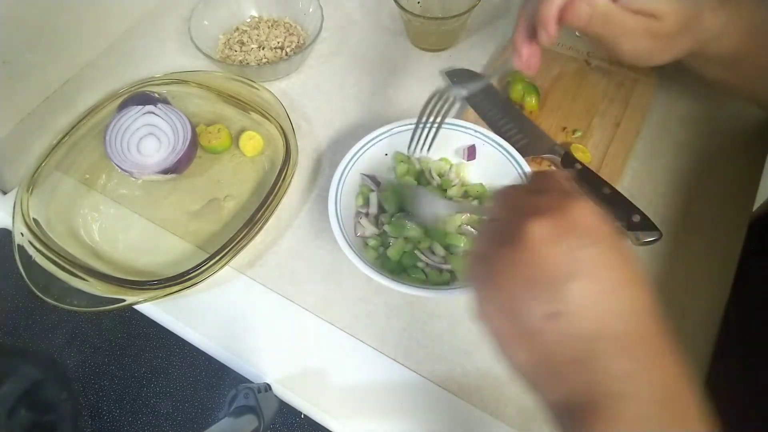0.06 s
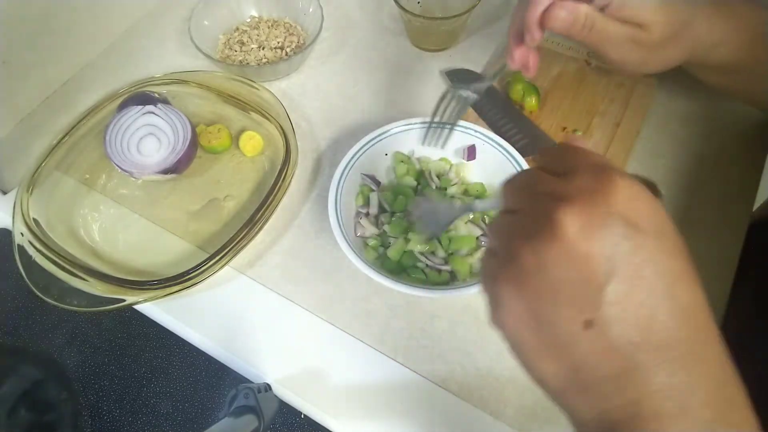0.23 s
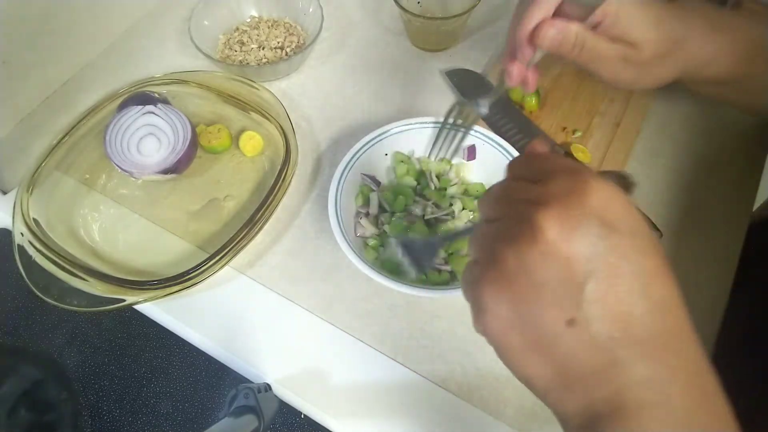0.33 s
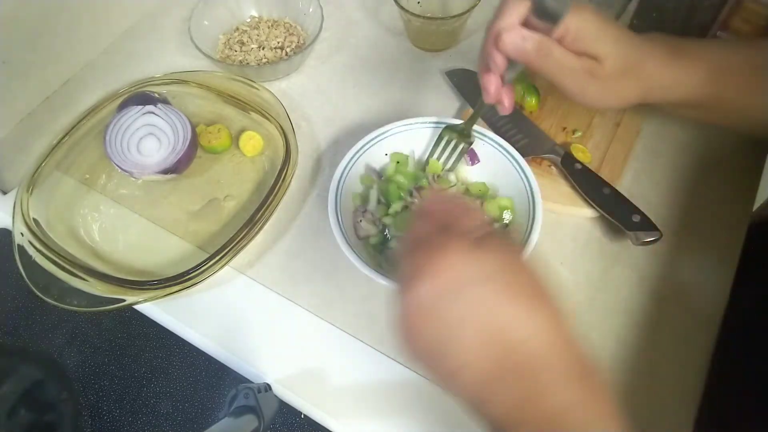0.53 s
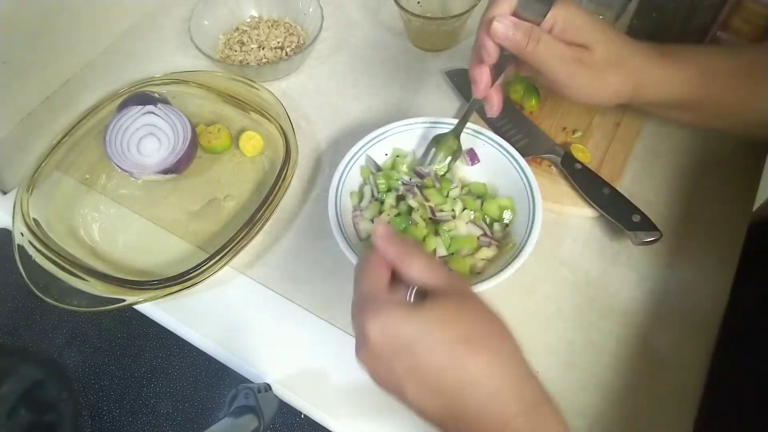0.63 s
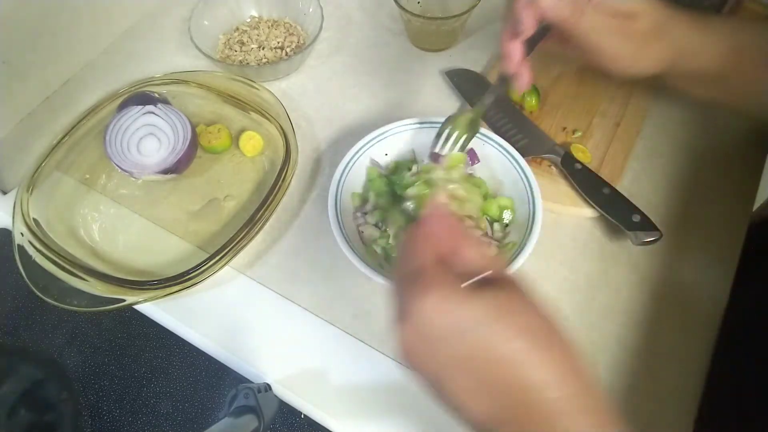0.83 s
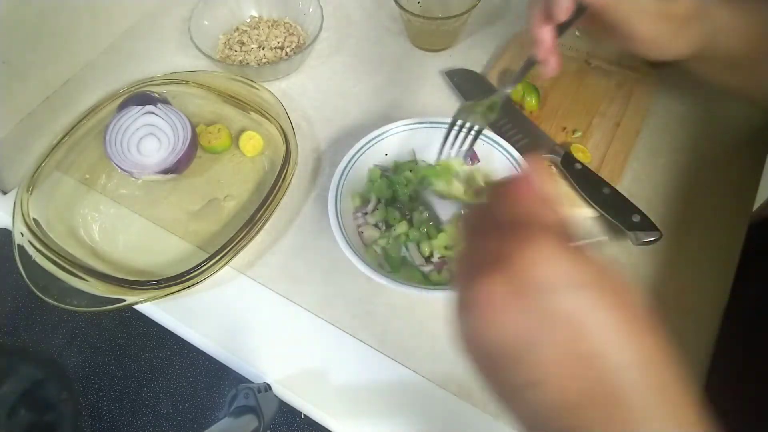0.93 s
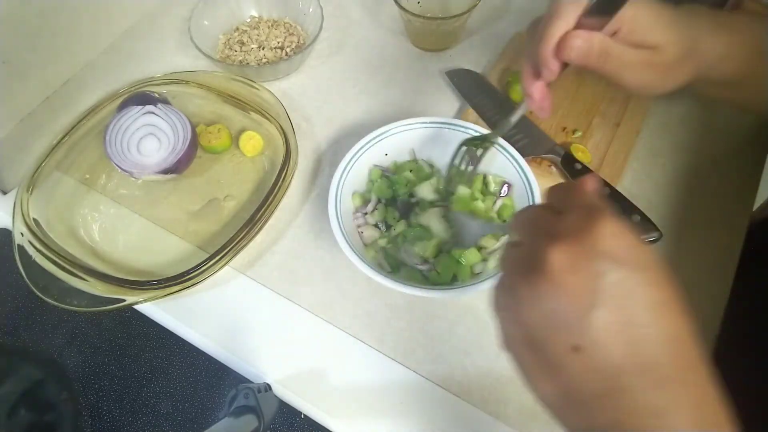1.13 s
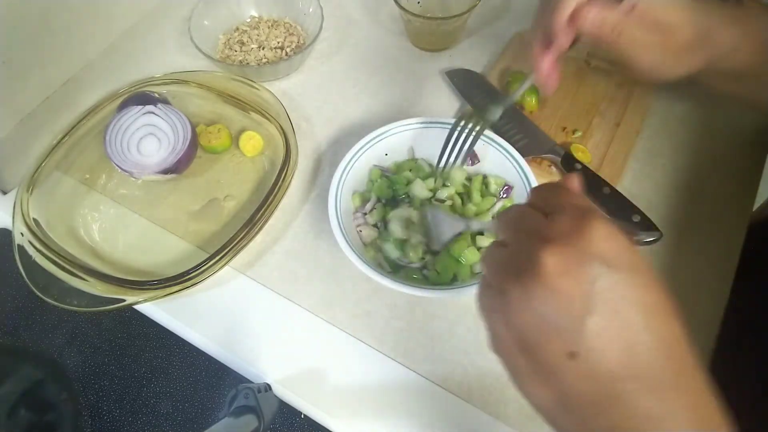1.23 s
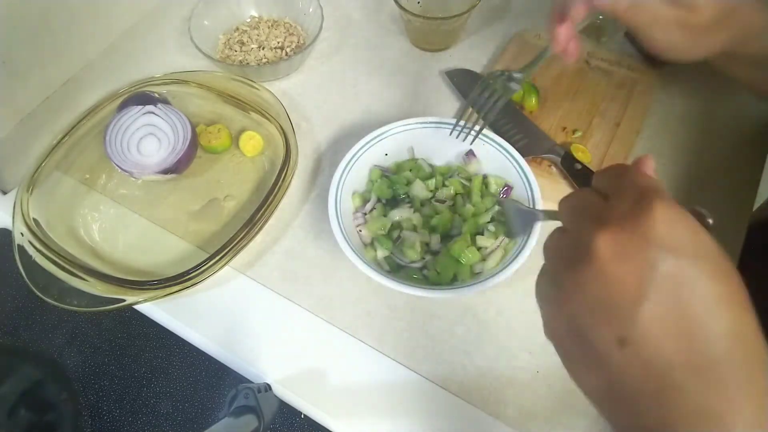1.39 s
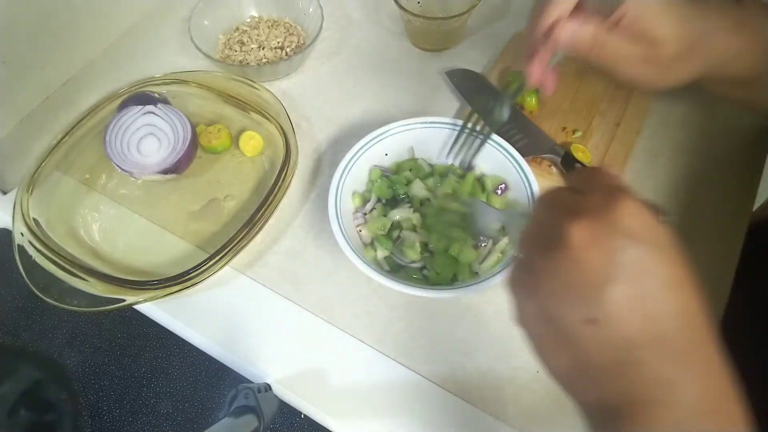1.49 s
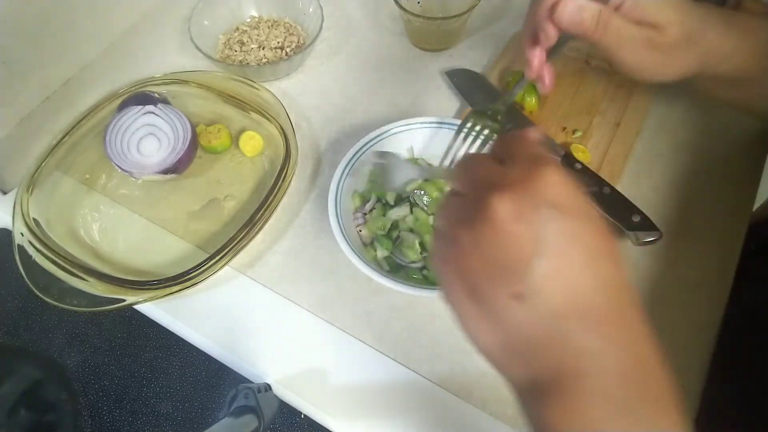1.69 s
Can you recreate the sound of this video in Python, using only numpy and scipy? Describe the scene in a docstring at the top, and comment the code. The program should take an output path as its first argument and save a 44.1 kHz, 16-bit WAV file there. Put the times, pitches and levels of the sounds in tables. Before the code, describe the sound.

Metal forks clink in a ceramic bowl of chopped vegetables. Soft rustles and a small tick come first, then a bouncing clink at 0.23 seconds, a faint downward slide, and the loudest, brightest clink at 0.4. Forks clash at 0.5, with scrapes until 0.67. Quiet wet rustles and low counter thuds follow; a weaker clink lands at 1.5. Close, small hard kitchen, faint hum and hiss.

```python
"""Two steel forks toss chopped vegetables in a ceramic bowl: tines clink on the bowl three times, bouncing,
and once the forks clash; each contact is a sum of damped modes with a noise crack, chatter and shimmer.
Scrapes are stick-slip noise through the modes of bowl or fork, and a faint gliding tone sounds between.
Wet pieces rustle and tick as shaped noise, and cushioned blows ring low modes.
A small hard room answers in decaying noise; the counter thuds under the bowl over a steady room tone."""
import sys
import numpy as np
from scipy import signal
from scipy.fft import rfft, irfft, next_fast_len
from scipy.io import wavfile
from scipy.ndimage import uniform_filter1d

SR = 44100
rng = np.random.default_rng(int(sys.argv[2]) if len(sys.argv) > 2 else 0)


def store_pcm(level_fs):
    """Save levels as 16-bit WAV."""
    pcm = np.round(np.clip(level_fs, -1, 1) * 32767).astype(np.int16)
    wavfile.write(sys.argv[1], SR, np.atleast_2d(pcm).T)


N = 77175
T = np.arange(SR // 2) / SR  # time axis of one event, s

# modes of the bowl: f/Hz, level struck on the wall/dB, level struck at the base/dB, t60/s
BOWL_MODES = [(1777, -16.5, -12.5, 0.22), (2040, -19, -18.5, 0.1), (2809, -29, -11.5, 0.13),
              (3280, -11, -14.5, .13), (3766, -24, -17.5, 0.16), (4420, -23.5, -22, 0.1),
              (5266, -9, -11, 0.098), (7357, -9.5, -5, 0.088), (8620, -18.5, -12.5, .11),
              (9680, -14.5, -3.5, 0.12), (10070, 4, -4.5, .09), (10400, -8.5, -4.5, 0.15),
              (10740, -11, -7, 0.082), (11430, -13.5, -9.5, .11), (12440, -0.5, -3.5, .13),
              (13000, -8.5, -11, .1), (14650, -10, -9, 0.11), (14780, -5, -7.5, .12)]
# modes of a fork: f/Hz, level/dB, t60/s
FORK_MODES = [(1453, -11.5, 0.075), (2745, -1, 0.019), (3995, -4.5, 0.11), (4730, -1.5, 0.069),
              (5320, -6.5, 0.031), (6500, -6.5, 0.029), (8290, -2.5, 0.081), (9040, -0.5, 0.06),
              (9970, -3.5, .04), (11560, 3, 0.064), (13300, 8, 0.051), (13630, -1.5, 0.047),
              (14870, -2.5, .04)]
# noise spectrum of a hard contact: f/Hz, level/dB
CRACK_SPECTRUM = [(300, -15.5), (800, -31), (1300, -21.5), (2000, -4), (4200, -10.5), (5300, 2),
                  (6200, -13.5), (7300, 0), (8200, -4), (10200, -1), (13000, 2.5), (15500, -15)]

RING_ATTACK_S = 0.0003
STEREO_HALFWAY_HZ = 450  # where the ports are halfway from alike to fully apart


def clinks():
    """Impact excitation: where a tine strikes the bowl sets how strongly each mode rings."""
    # tine on bowl: t/s, level/dB, brightness/(dB/octave), crack/dB, depth (0 wall to 1 base), t60 factor
    bowl_hits = [(0.2311, -18, 2, -5.5, 0.1, 0.68), (.2338, -16.5, 1.5, -4.5, 0.055, 0.4),
                 (0.2458, -27.5, -1, -7, 0.27, 0.78), (0.399, -13, 4.5, -0.5, 0.96, 0.59),
                 (0.4028, -15.5, 0.5, -4.5, 0.84, 0.7), (0.4065, -19, -1.5, -1, 0.74, 1),
                 (.437, -28.5, -2.5, -6.5, .9, .8), (1.5043, -25, 0.5, 3.5, 1, 0.44),
                 (1.5079, -26, 0.5, 0.5, 1, 0.54), (1.522, -44.5, -5, 8, 0.84, .8)]
    out = np.zeros((2, N))
    hz, wall_db, base_db, t60 = np.transpose(BOWL_MODES)
    for s, db, tilt_db, crack_db, depth, sustain in bowl_hits:
        mode_db = wall_db + depth * (base_db - wall_db)
        modes = np.transpose([hz, mode_db, t60 * sustain])
        add(out, s, amp(db) * contact(modes, tilt_db, crack_db))
    return out


def clashes():
    """Impact excitation of fork against fork: the damped modes of the steel."""
    # fork on fork: t/s, level/dB, brightness/(dB/octave), crack/dB
    fork_hits = [(0.4983, -21.5, 8, 7.5), (0.5005, -20.5, 6, -4), (0.57, -38.5, -3.5, -13),
                 (.603, -42.5, -4.5, 4), (0.6136, -33.5, 4.5, -16)]
    out = np.zeros((2, N))
    for s, db, tilt_db, crack_db in fork_hits:
        add(out, s, amp(db) * contact(FORK_MODES, tilt_db, crack_db))
    return out


def contact(modes, tilt_db, crack_db):
    """Hard contact: broadband crack, modal ringing, chatter that blurs each mode, and shimmering steel."""
    ring_db, chatter_db, shimmer_db = 4, -4, -5.5
    chatter_life = 0.9  # chatter t60 over the mean t60 of the modes
    crack_t60_s = 0.022
    body = ring(twins(modes), tilt_db, RING_ATTACK_S)
    chatter_t60_s = chatter_life * np.mean(modes, axis=0)[2]
    chatter = resonant(diffuse(len(T)), modes, tilt_db, width_hz=70) * fade(chatter_t60_s)
    crack = burst(CRACK_SPECTRUM, crack_t60_s, tilt_db)
    out = amp(ring_db) * body + amp(chatter_db) * chatter
    return out + amp(shimmer_db) * shimmer(tilt_db, count=45) + amp(crack_db) * crack


def twins(modes):
    """Beating of near-degenerate modes: each mode gains a weaker twin close in frequency."""
    spread, twin_db = 0.012, -5.5  # relative detuning scale, twin level
    hz, db, t60 = np.transpose(modes)
    twin_hz = hz * (1 + spread * rng.uniform(-1.1, 1, len(hz)))
    return np.vstack([modes, np.transpose([twin_hz, db + twin_db, t60])])


def shimmer(tilt_db, count):
    """High modal density: a cloud of faint modes, drawn anew for each contact."""
    low_hz, high_hz = 3594, 15230
    median_t60_s = 0.125
    hz = low_hz + (high_hz - low_hz) * (np.arange(count) + rng.random(count)) / count
    db = along(CRACK_SPECTRUM, hz) + rng.normal(0, 2.6, count)
    t60 = median_t60_s * np.exp(rng.normal(0, 0.035, count))
    return ring(np.transpose([hz, db, t60]), tilt_db, RING_ATTACK_S)


def ring(modes, tilt_db, attack_s):
    """Modal superposition: a harder contact favours high modes, whose phases at the two ports drift apart with
    frequency, up to about 90."""
    hz, db, t60 = np.transpose(modes)[:, :, None]
    gain = amp(db + tilt_db * np.log2(hz))
    side = np.array([-1, 1])[:, None, None] * rng.choice([-1, 1], hz.shape)
    apart = side * stereo_angle(hz)
    phase = 2 * np.pi * (hz * T + rng.random(hz.shape)) + apart
    waves = np.sin(phase) * fade(t60)
    return (gain / np.linalg.norm(gain) * waves).sum(1) * (1 - np.exp(-T / attack_s))


def resonant(x, modes, tilt_db, width_hz):
    """Forced resonance: x through a body's modes, widened by the touch of the fork, at rms 1."""
    def response(f):
        total = 0
        for k, (hz, db, *_) in enumerate(modes):
            damping = 1j * f * width_hz
            gain = (-1) ** k * amp(db + tilt_db * np.log2(hz))  # neighbours alternate in sign
            total = total + gain * damping / (hz * hz - f * f + damping)
        return total
    return unit(filtered(x, response))


def burst(spectrum, t60, tilt_db=0):
    """Transient contact noise: a coloured spectrum under exponential decay."""
    return coloured(diffuse(len(T)), spectrum, tilt_db) * fade(t60)


def scrapes():
    """Stick-slip friction: slips ring bowl or fork, and contact pressure detunes the modes."""
    # tine gliding down the wall: t/s, hold end after t/s, level/dB, brightness/(dB/octave)
    wall_glides = [(.268, .055, -47, 1.5), (.345, .024, -46, 1), (.455, 0.066, -44, -2.5)]
    # fork dragged over the glaze: t/s, hold end after t/s, level/dB, brightness/(dB/octave)
    fork_drags = [(.515, 0.084, -45, -2), (.57, 0.049, -39.5, 1.5), (.645, 0.02, -45.5, 1)]
    # dry grit beside the modes: f/Hz, level/dB
    grit_spectrum = [(300, -2), (1000, -10), (2200, -5), (6600, -10.5), (12900, -3.5), (15500, -5)]
    detune = 0.018  # greatest relative shift of a mode
    out = np.zeros((2, N))
    for rows, modes, grit_db in (wall_glides, BOWL_MODES, -4.5), (fork_drags, FORK_MODES, -6.5):
        for s, length, db, tilt_db in rows:
            slips = stick_slip()
            pressed = [(hz * (1 + detune * rng.uniform(-1, 1)), level) for hz, level, *_ in modes]
            body = resonant(slips, pressed, tilt_db, width_hz=160)
            grit = coloured(slips, grit_spectrum, tilt_db)
            add(out, s, amp(db) * stroke_shape(length) * (body + amp(grit_db) * grit))
    return out


def stick_slip():
    """Relaxation oscillation: steel catches and lets go unevenly, each release a tiny noise burst."""
    slips_per_s, spread_db, slip_t60_s = 650, 4.5, 0.008  # mean rate, level deviation, decay
    at = np.cumsum(rng.uniform(.3, 1.7, 400)) * SR / slips_per_s
    kick_sizes = amp(spread_db * rng.standard_normal(len(at)))
    kicks = np.bincount(at.astype(int), kick_sizes, len(T))[:len(T)]
    envelope = signal.fftconvolve(kicks, fade(slip_t60_s))[:len(T)]
    return diffuse(len(T)) * envelope


def stroke_shape(length):
    """Amplitude envelope: a stroke swells, holds until length and dies exponentially."""
    attack_s, release_s = 0.006, 0.009  # linear rise time, decay time constant
    return np.minimum(T / attack_s, 1) * np.exp(-np.maximum(T - length, 0) / release_s)


def slide():
    """Frequency modulation: a faint, rough tone of inharmonic partials wanders lower as the tine slides."""
    # course of the tone: t/s, f/Hz, level/dB
    pitch_course = [(0.252, 1750, -71.5), (0.277, 1704, -61.5), (0.317, 1736, -59.5), (0.367, 1523, -61),
                    (0.388, 1500, -75)]
    # partials: multiple of f, level/dB
    partials = [(1, -4), (1.44, -7), (1.92, -5.5), (3.1, -7.5)]
    rough_rad = 0.14  # rms phase wander, before the partial's multiple
    s, hz, db = np.transpose(pitch_course)
    t = np.arange(N) / SR
    phase = 2 * np.pi * np.cumsum(np.interp(t, s, hz)) / SR
    tone = np.zeros(N)
    for multiple, level in partials:
        waver = rough_rad * unit(uniform_filter1d(rng.standard_normal(N), size=150))
        tone += amp(level) * np.sin(multiple * (phase + waver))
    return tone * np.interp(t, s, amp(db), left=0, right=0)


def rustles():
    """Granular friction: wet pieces slide over each other in dense random slips."""
    # strokes: t/s, hold end after t/s, level/dB, brightness/(dB/octave)
    rustle_strokes = [(.02, 0.009, -51.5, -0.5), (.105, 0.0088, -46, -2.5), (.74, 0.027, -60, -1),
                      (.825, 0.019, -62.5, -1), (.89, 0.14, -64, -7), (1.085, 0.11, -59.5, 0),
                      (1.165, 0.031, -52, -0.5), (1.464, 0.014, -45, 1.5)]
    # spectrum of wet slips: f/Hz, level/dB
    rustle_spectrum = [(300, -6), (1000, -11), (2600, 1.5), (3600, -4.5), (5200, -2), (6500, -3.5),
                       (9000, -0.5), (12000, 7), (15500, 0)]
    grains_per_s, spread_db = 3000, 2.5
    out = np.zeros((2, N))
    for s, length, db, tilt_db in rustle_strokes:
        hits = rng.random(len(T)) < grains_per_s / SR
        sizes = amp(spread_db * rng.standard_normal(len(T)))
        slips = hits * sizes * diffuse(len(T))
        add(out, s, amp(db) * stroke_shape(length) * coloured(slips, rustle_spectrum, tilt_db))
    return out


def ticks():
    """Sudden release: wet pieces snap apart in short noise bursts."""
    # single ticks: t/s, level/dB
    tick_events = [(.0728, -37.5), (.164, -51.5), (.755, -50), (.94, -46.5), (1.344, -49.5)]
    # spectrum of a tick: f/Hz, level/dB
    tick_spectrum = [(1000, -20), (4000, -32.5), (9000, -2), (13000, 7), (15500, -11)]
    out = np.zeros((2, N))
    for s, db in tick_events:
        add(out, s, amp(db) * burst(tick_spectrum, t60=0.0124))
    return out


def knocks():
    """Cushioned impact: soft blows through the salad wake only low modes of the bowl, with a puff of noise."""
    # blows: t/s, level/dB, brightness/(dB/octave), puff/dB
    soft_blows = [(.0215, -50.5, -8, 5.5), (.403, -51.5, 4, 15.5), (.499, -48.5, 8, 22.5),
                  (.527, -56, -9.5, 12.5), (.572, -59.5, 4, 11.5), (.995, -70.5, 0, 13),
                  (1.09, -59, -15, 1), (1.134, -53, -9, 5), (1.415, -64.5, -31, 1.5)]
    # modes under a cushioned blow: f/Hz, level/dB, t60/s
    cushioned_modes = [(660, 4.5, 0.24), (815, -4, 0.12), (1260, -9.5, .05), (1780, 4.5, 0.22)]
    # spectrum of the puff: f/Hz, level/dB
    puff_spectrum = [(100, 6), (300, -9), (800, 6), (1600, -5), (3000, -23.5), (9000, -29.5)]
    out = np.zeros((2, N))
    for s, db, tilt_db, puff_db in soft_blows:
        body = ring(cushioned_modes, tilt_db, RING_ATTACK_S)
        puff = burst(puff_spectrum, 0.051, tilt_db)
        add(out, s, amp(db) * (body + amp(puff_db) * puff))
    return out


def thuds():
    """Structure-borne sound: the counter's low modes boom when the bowl is pushed down."""
    # pushes: t/s, level/dB, brightness/(dB/octave)
    pushes = [(0.019, -44, 5.5), (0.1, -45, -5), (.233, -38.5, 6.5), (0.36, -59, 9), (0.403, -36.5, 15),
              (0.464, -47, -2), (0.501, -32.5, -1), (0.5271, -32.5, 0), (0.574, -39, 2.5),
              (0.646, -44.5, 3), (0.899, -47, 2), (.94, -46.5, -11.5), (1.021, -47.5, -1),
              (1.1, -50.5, -7.5), (1.137, -43, 6), (1.412, -61, 14), (1.505, -40, 4.5), (1.556, -40.5, -12)]
    # modes of the counter: f/Hz, level/dB, t60/s
    counter_modes = [(61.7, -14.5, .2), (106.3, 1.5, 0.19), (167, -5.5, 0.25), (255.5, -9.5, 0.18),
                     (303.4, -7.5, 0.11), (561, -21.5, 0.058)]
    out = np.zeros((2, N))
    for s, db, tilt_db in pushes:
        add(out, s, amp(db) * ring(counter_modes, tilt_db, attack_s=0.001207))
    return out


def kitchen(x):
    """Reverberation: direct sound plus a diffuse tail whose decay time depends on frequency."""
    # decay of the room: f/Hz, t60/s
    room_decay = [(150, 0.18), (1500, 0.25), (5000, 0.3), (14000, 0.19)]
    tail_db, onset_s = -8.5, 0.0046
    hz, t, z = signal.stft(diffuse(len(T)), SR, nperseg=256)
    decay = np.exp(-np.log(1000) * t / along(room_decay, hz)[:, None])
    tail = signal.istft(z * decay, SR, nperseg=256)[1][:, :len(T)]
    tail = unit(tail * (1 - np.exp(-T / onset_s))) / np.sqrt(len(T))
    return x + amp(tail_db) * signal.fftconvolve(x, tail, axes=1)[:, :N]


def room_tone():
    """Stationary background noise: a low hum and a hiss, each with a fixed spectrum."""
    # hum: f/Hz, density/(dB per Hz)
    hum_spectrum = [(25, -29), (45, -9), (65, -4), (105, 0.5), (200, -13), (400, -22), (1000, -31.5),
                    (3000, -33.5)]
    # hiss: f/Hz, density/(dB per Hz)
    hiss_spectrum = [(500, -6), (1000, -12.5), (2200, -5), (4000, -6.5), (7000, -15), (10000, -5.5),
                     (12500, 1), (15500, -2)]
    hum = coloured(diffuse(N), hum_spectrum)
    hiss = coloured(diffuse(N), hiss_spectrum)
    return amp(-60.5) * hum + amp(-64.5) * hiss


def amp(db):
    """Decibel definition: level to amplitude ratio."""
    return 10 ** (np.asarray(db) / 20)


def unit(x):
    """Normalisation to rms 1."""
    return x / np.sqrt(np.mean(x ** 2) + 1e-20)


def along(points, hz):
    """Interpolation of (f, value) points on a logarithmic frequency axis."""
    f, v = np.transpose(points)
    return np.interp(np.log(hz + 1), np.log(f + 1), v)


def fade(t60):
    """Exponential decay by 60 dB in t60."""
    return np.exp(-np.log(1000) * T / t60)


def add(track, s, x):
    """Linear superposition: mix x into the track at time s."""
    i = max(round(s * SR), 0)
    track[..., i:i + x.shape[-1]] += x[..., :N - i]


def filtered(x, response):
    """Linear filtering: the spectrum of x times a response of frequency."""
    n = x.shape[-1]
    m = next_fast_len(n + 8192)
    return irfft(rfft(x, m) * response(np.fft.rfftfreq(m, 1 / SR)), m)[..., :n]


def coloured(x, spectrum, tilt_db=0):
    """Spectral shaping: x with a spectrum and a tilt per octave above 500 Hz, at rms 1."""
    def response(hz):
        octaves = np.log2(np.maximum(hz, 500) / 500)
        return amp(along(spectrum, hz) + tilt_db * octaves)
    return unit(filtered(x, response))


def stereo_angle(hz):
    """Frequency-dependent separation: the angle grows from 0 in the bass towards pi/4 in the treble."""
    return np.pi / 4 * hz / (hz + STEREO_HALFWAY_HZ)


def diffuse(size):
    """Diffuse-field coherence: stereo noise alike in the bass, nearly unrelated in the treble."""
    noise = rng.standard_normal((2, size))
    mid, side = filtered(noise, lambda hz: np.array([np.cos(stereo_angle(hz)), np.sin(stereo_angle(hz))]))
    return np.array([mid + side, mid - side])


def scene():
    """Superposition: forks, bowl and salad excite the room; counter thuds and room tone join directly."""
    forks = clinks() + clashes() + scrapes() + slide()
    salad = rustles() + ticks() + knocks()
    return kitchen(forks + salad) + thuds() + room_tone()


def record(dry):
    """Two-port reception: level and delay differences between ports, then a band limit at both ends."""
    # level difference: f/Hz, left minus right/dB
    port_balance = [(100, 1.6), (280, -1.5), (1000, -0.1), (2500, 0), (5000, -1), (9000, -1), (13000, 1)]
    lag_s = 0.00011  # left behind right
    low_cut_hz, top_hz = 48, 15650
    sides = np.array([[.5], [-.5]])

    def port_response(hz):
        level = amp(along(port_balance, hz) * sides)
        return level * np.exp(-2j * np.pi * hz * lag_s * sides)

    def band_limit(hz):
        bass_cut = hz ** 4 / (hz ** 4 + low_cut_hz ** 4)
        return bass_cut / np.sqrt(1 + (hz / top_hz) ** 160)

    return filtered(filtered(dry, port_response), band_limit)


dry = scene()
out = record(dry)
store_pcm(out)
```